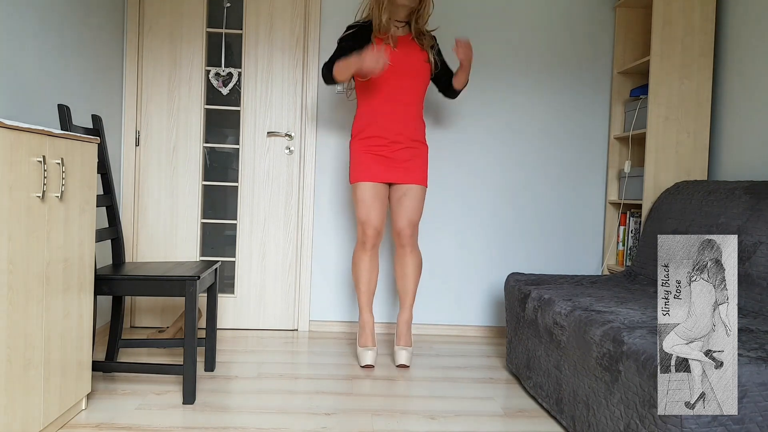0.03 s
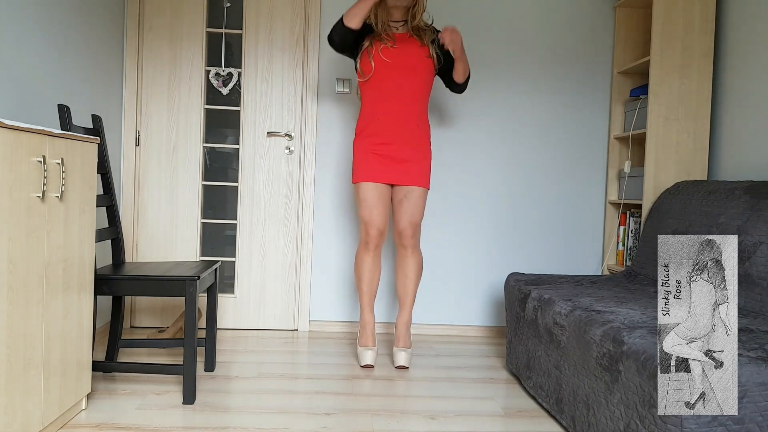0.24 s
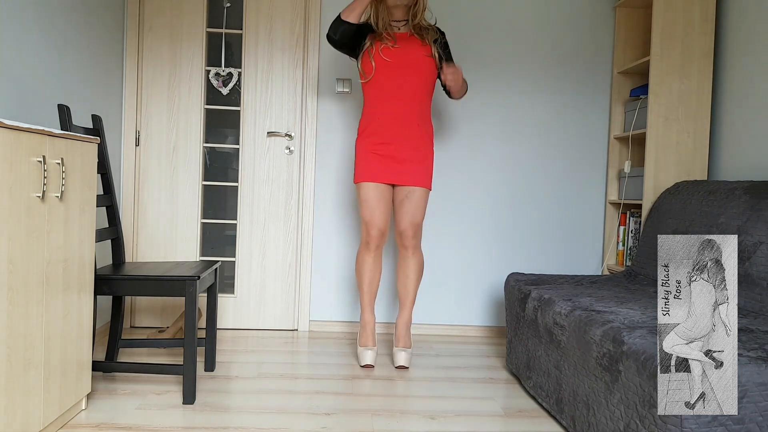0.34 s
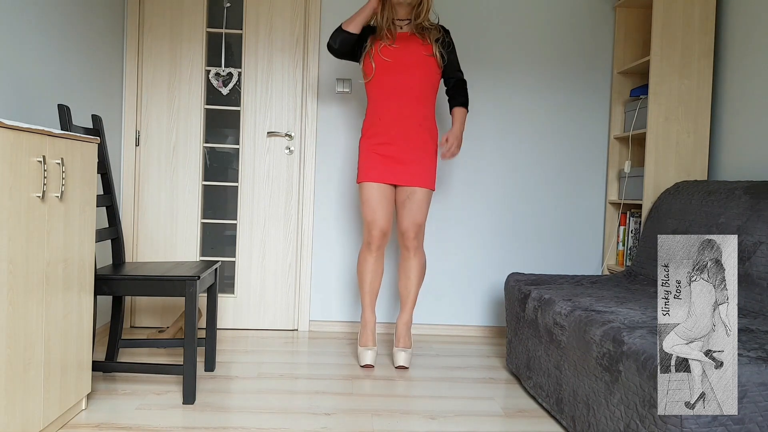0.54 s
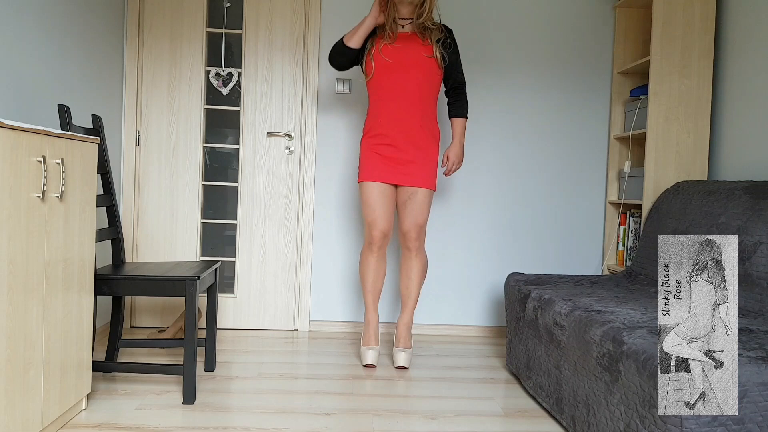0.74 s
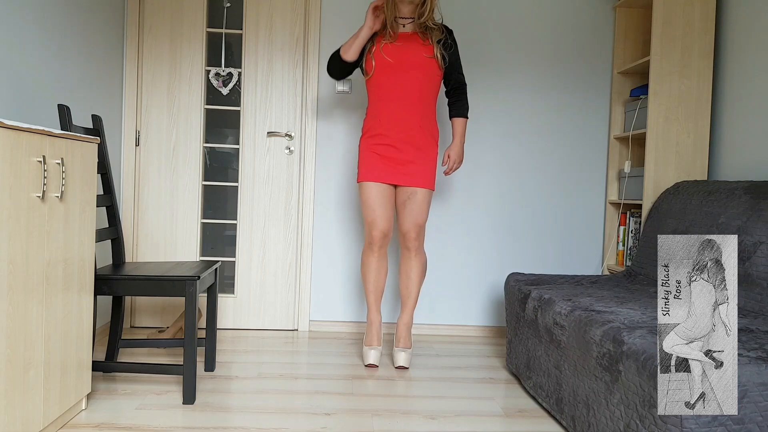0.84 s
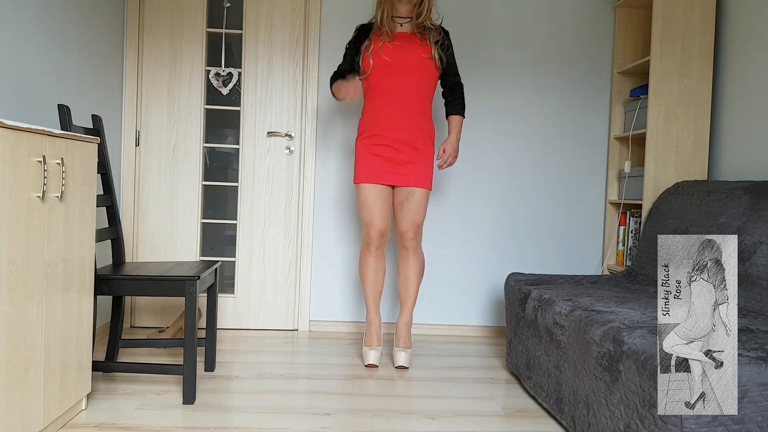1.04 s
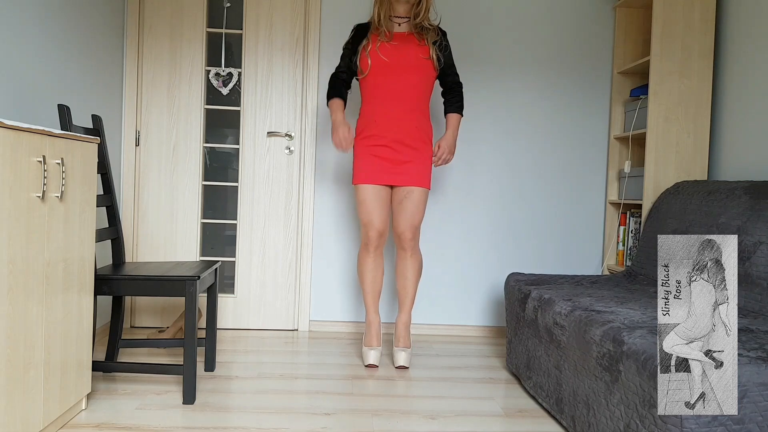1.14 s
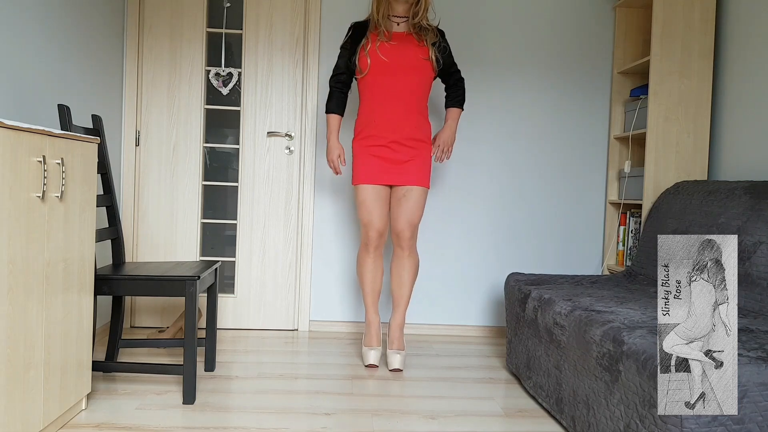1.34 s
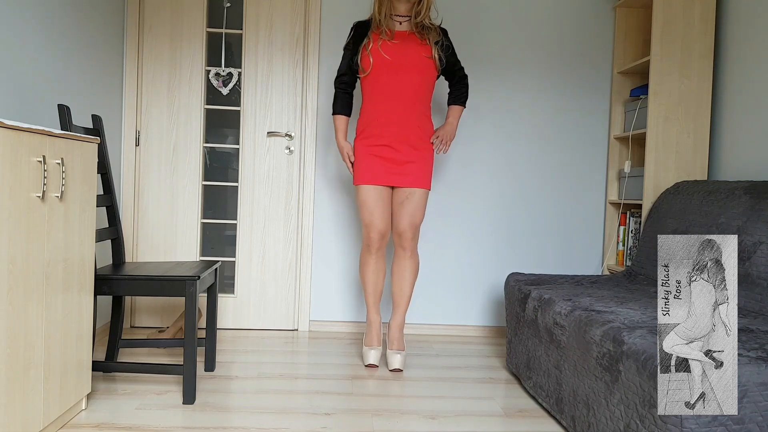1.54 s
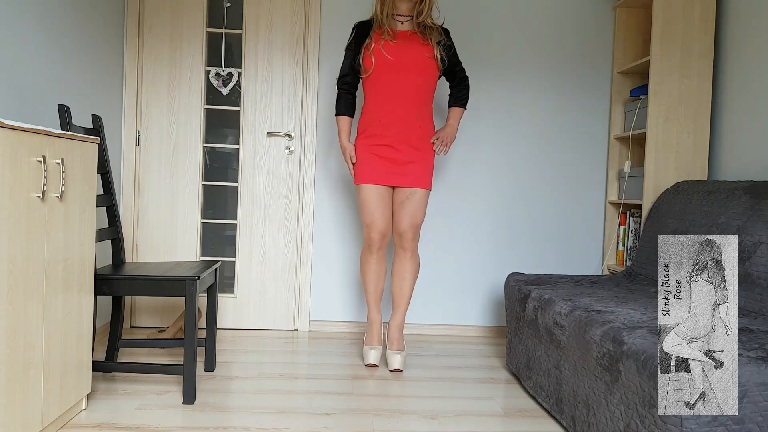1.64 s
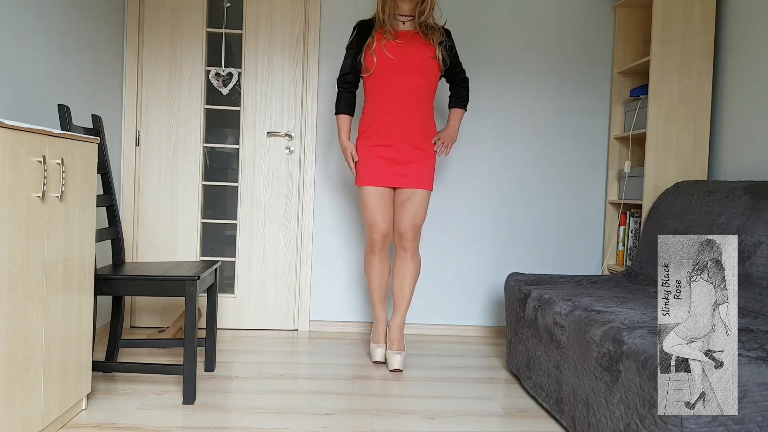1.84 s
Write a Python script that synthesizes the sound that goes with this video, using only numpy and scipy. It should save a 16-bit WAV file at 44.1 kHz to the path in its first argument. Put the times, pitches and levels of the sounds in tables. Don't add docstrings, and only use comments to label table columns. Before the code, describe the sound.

High-heeled shoes on a laminate floor. Faint sole and heel taps at the start, then a heavy woody step at 0.23 s with a low boom and a scuff fading by 0.6. Light heel-tip taps at 0.7, soft sole rolls around 0.85-1.0, dull creaking and taps near 1.2-1.3. A softer double step at 1.47-1.6, closing scuff and heel tap at 1.82. Small room, quiet rumble and hiss.

```python
import sys
import numpy as np
from scipy import signal
from scipy.fft import rfft, irfft, next_fast_len
from scipy.io import wavfile

SR = 44100
rng = np.random.default_rng(int(sys.argv[2]) if len(sys.argv) > 2 else 0)


def int16_out(signal):
    q = np.round(np.clip(np.atleast_2d(signal).T, -1, 1) * 32767)
    wavfile.write(sys.argv[1], SR, q.astype(np.int16))


def volts_from_decibels(level):
    exponent = np.asarray(level, float) / 20
    return 10 ** exponent


N = 81585

KNOCK_DB = -7


def unit(x):
    return x / np.sqrt(np.mean(x ** 2) + 1e-20)


def along(points, hz):
    f, v = np.transpose(points)
    return np.interp(np.log(hz + 1), np.log(f + 1), v)


def filtered(x, response):
    n = x.shape[-1]
    m = next_fast_len(n + 8192)
    return irfft(rfft(x, m) * response(np.fft.rfftfreq(m, 1 / SR)), m)[..., :n]


def spread(pair, spectrum, alike):
    def mid_and_side(hz):
        turn = np.arccos(np.clip(along(alike, hz), -1, 1)) / 2
        return volts_from_decibels(along(spectrum, hz)) * [np.cos(turn), np.sin(turn)]

    mid, side = filtered(pair, mid_and_side)
    return unit(np.array([mid + side, mid - side]))


# (frequency [Hz], level [dB per Hz])
TONE_COLOUR = [(25, -11), (75, -11.5), (200, -12.5), (400, -8.5), (900, -17.5), (2600, -22), (8000, -36),
               (13000, -33.5)]
# (frequency [Hz], likeness [-1 to 1])
NOISE_LIKENESS = [(40, 0.7), (150, 0.72), (600, 0.59), (2000, 0.031), (8000, .0)]


def room_tone():
    return volts_from_decibels(-63) * spread(rng.standard_normal((2, N)), TONE_COLOUR, NOISE_LIKENESS)


def rub(pressure, colour):
    grains_per_s, grain_spread_db, smooth_share = 2500, 1.5, 0.6
    happens = rng.random((2, N)) < grains_per_s / SR
    hits = happens * volts_from_decibels(grain_spread_db * rng.exponential(size=(2, N)))
    grit = unit(hits * rng.standard_normal((2, N)))
    drag = rng.standard_normal((2, N))
    noise = np.sqrt(1 - smooth_share) * grit + np.sqrt(smooth_share) * drag
    s, db = np.transpose(pressure)
    s = np.r_[s[0] - 0.015, s, s[-1] + 0.06]
    db = np.r_[db[0] - 20, db, db[-1] - 20]
    swell = volts_from_decibels(np.interp(np.arange(N) / SR, s, db, -120, -120))
    return spread(noise, colour, NOISE_LIKENESS) * swell


# (time [s], level [dB])
CREAK_PRESSURE = [(0.8, -78), (0.864, -83), (1.004, -63), (1.124, -97), (1.242, -74), (1.316, -57),
                  (1.358, -65), (1.382, -64), (1.42, -99)]
# (frequency [Hz], level [dB per Hz])
CREAK_TINT = [(88, -57), (150, -3), (476, -7), (538, -9), (1350, 0.5), (1510, -5.5), (4000, -35),
              (5200, -68), (8800, -120)]


def creak():
    return rub(CREAK_PRESSURE, CREAK_TINT) * volts_from_decibels(-2.5)


# (time [s], level [dB])
OPENING_PRESSURE = [(0.0, -78), (0.028, -58.5), (0.122, -68), (0.16, -106.5)]
# (time [s], level [dB])
MIDDLE_PRESSURE = [(0.226, -63), (0.24, -61), (0.326, -72.5), (0.494, -72), (0.616, -95), (0.62, -112)]
# (time [s], level [dB])
CLOSING_PRESSURE = [(1.64, -68), (1.67, -67.5), (1.704, -60.5), (1.768, -60), (1.812, -64.5), (1.85, -63.5)]
# (frequency [Hz], level [dB per Hz])
MIDDLE_COLOUR = [(120, -62), (200, -13), (410, -7.5), (598, -18.5), (1020, -7.5), (1440, -12.5),
                 (1720, -15.5), (11800, -34), (14600, -28)]
# (frequency [Hz], level [dB per Hz])
OUTER_COLOUR = [(150, -10.5), (350, -0.5), (650, -6), (1020, 1), (1500, -5.5), (2800, -13.5), (4800, -25),
                (12000, -38.5)]


def scuffs():
    opening = rub(OPENING_PRESSURE, OUTER_COLOUR)
    middle = rub(MIDDLE_PRESSURE, MIDDLE_COLOUR) * volts_from_decibels(16.5)
    closing = rub(CLOSING_PRESSURE, OUTER_COLOUR) * volts_from_decibels(7.5)
    return opening + middle + closing


def ringing(modes, t, pitch_hz, octaves, rise_s):
    hz, level_db, t60 = (column[:, None] for column in np.transpose(modes))
    scatter_db = 0.8 * rng.standard_normal(hz.shape)
    weight_db = level_db - 6 * (np.log2(hz / pitch_hz) / octaves) ** 2 + scatter_db
    tones = volts_from_decibels(weight_db - 60 * t / t60) * np.sin(2 * np.pi * hz * t)
    return -tones.sum(axis=0) * (1 - np.exp(-t / rise_s))


# (frequency [Hz], level [dB], time to fall 60 dB [s])
AIR_MODES = [(72, -11.5, 0.17), (114.4, 1.5, 0.075), (124.4, -11, 0.059), (164.5, -2.5, 0.28),
             (192.2, -9.5, 0.27), (251, -27, .3)]
# (time [s], level [dB])
LANDINGS = [
    (0.229, -32),
    (0.257, -25),
    (.95, -43),
    (1.297, -65),
    (1.469, -34),
    (1.495, -32),
    (1.564, -34.5),
    (1.621, -51),
    (1.819, -43),
]


def booms():
    out, t = np.zeros(N + SR), np.arange(round(0.6 * SR)) / SR
    for s, db in LANDINGS:
        boom = ringing(AIR_MODES, t, pitch_hz=190, octaves=1.7, rise_s=0.029)
        out[round(s * SR):][:len(t)] += volts_from_decibels(db + KNOCK_DB) * boom
    return out[:N]


# (left delay [s], right delay [s], level [dB])
WALL_ECHOES = [(.004, 0.0063, -7.5), (.0083, 0.013, -11), (0.0154, 0.0088, -10.5), (.019, 0.026, -13.5),
               (.031, 0.011, -18.5)]
# (frequency [Hz], time to fall 60 dB [s])
TAIL_DECAY = [(120, 0.93), (500, 0.31), (2000, 0.49), (6000, 0.1), (13000, 0.051)]
# (frequency [Hz], likeness [-1 to 1])
TAIL_LIKENESS = [(150, 0.86), (400, 1), (1000, 0.16), (2500, -0.24), (12000, -0.3)]


def room(x, tail_db):
    n = len(x)
    hz, t, z = signal.stft(rng.standard_normal((2, n)), SR, nperseg=256)
    fading = z * volts_from_decibels(-60 * t / along(TAIL_DECAY, hz)[:, None])
    pair = signal.istft(fading, SR, nperseg=256)[1][:, :n]
    build_up = 1 - np.exp(-(np.arange(n) / SR / 0.0066) ** 2)
    tail = spread(pair, [(1000, 0)], TAIL_LIKENESS) * build_up
    answer = volts_from_decibels(tail_db) * tail / np.linalg.norm(tail[0])
    answer[:, 0] = 1
    for left_s, right_s, db in WALL_ECHOES:
        answer[[0, 1], [round(left_s * SR), round(right_s * SR)]] += volts_from_decibels(db)
    return signal.fftconvolve(x[None], answer, axes=1)[:, :n]


# (frequency [Hz], level [dB per Hz])
CLICK_COLOUR = [(900, -37), (1500, -18), (2300, -2), (3200, 0), (5000, -0.5), (7500, -20.5), (11500, -14),
                (14600, -19)]


def tip_click(t, dull):
    def response(hz):
        loss_db = dull * np.log2(1 + (hz / 6500) ** 2) / 2
        return volts_from_decibels(along(CLICK_COLOUR, hz) - loss_db)

    return unit(filtered(rng.standard_normal(len(t)), response)) * volts_from_decibels(-60 * t / 0.1)


def contacts(rows, modes, gain_db, tail_db, softer=1):
    hard_db, dulling = -57, 0.6
    out, t = np.zeros((2, N + SR)), np.arange(round(0.6 * SR)) / SR
    low_cut = signal.butter(2, 118, "high", fs=SR)
    for s, db, pitch_hz, octaves, click_db in rows:
        rise_s = softer * 0.66 / (pitch_hz * np.clip(octaves, 0.35, 1))
        ring = signal.lfilter(*low_cut, ringing(modes, t, pitch_hz, octaves, rise_s))
        click = tip_click(t, dulling * max(hard_db - db - click_db, 0))
        knock = room(volts_from_decibels(gain_db) * ring, tail_db)
        knock = knock + room(volts_from_decibels(click_db + 0.5) * click, tail_db=-4)
        out[:, round(s * SR):][:, :len(t)] += volts_from_decibels(db) * knock
    return out[:, :N]


# (frequency [Hz], level [dB], time to fall 60 dB [s])
HEEL_MODES = [(336, 4, 0.033), (540, 1, 0.038), (834, -1, 0.027), (1040, 3, 0.023), (1192, 2, 0.015),
              (1386, 0.5, 0.0083), (1860, 0, 0.024), (2230, -3.5, 0.019), (2920, -5, 0.005)]
# (time [s], level [dB], contact pitch [Hz], width [octaves], click over the knock [dB])
HEEL_TAPS = [(.0218, -38, 663, 1.26, -35.5), (.0255, -36.5, 330, 0.84, -46), (.680, -31, 964, 0.79, -34.5),
             (.6845, -33.5, 1040, 0.68, -44), (.716, -41, 1150, 0.45, -35), (.690, -38.5, 1700, 1.3, -37),
             (.703, -43, 1190, 0.78, -27.5), (.731, -41.5, 1270, 0.7, -49), (.752, -51, 1117, 1.7, -46),
             (1.275, -43.5, 1090, 0.93, -33), (1.279, -41, 394, 1.1, -42),
             (1.3042, -37.5, 970, 1.14, -33.5), (1.3075, -38, 353, 0.51, -44),
             (1.821, -34, 970, 0.89, -31.5)]


def heel_taps():
    return contacts(HEEL_TAPS, HEEL_MODES, gain_db=-11, tail_db=-10)


# (frequency [Hz], level [dB], time to fall 60 dB [s])
BOARD_MODES = [(322.5, -6.5, 0.039), (356.6, 0, 0.052), (434.6, -3, 0.039), (505.3, 6.5, 0.02),
               (548, 4.5, 0.023), (659.6, 0.5, 0.05), (763.6, -5.5, 0.067), (809.6, -1, 0.044),
               (842.3, -2.5, 0.025), (1026, 3, 0.039), (1110, 2, 0.024), (1283, -0.5, 0.036),
               (1680, -1, 0.044), (1860, -16, 0.016)]
# (time [s], level [dB], contact pitch [Hz], width [octaves], click over the knock [dB])
SOLE_ROLLS = [(0.001, -48, 356, 0.64, -47), (.066, -43, 575, .3, -29), (0.818, -67, 450, 0.69, -32),
              (.856, -45, 670, 0.48, -37), (.866, -40, 656, 0.4, -41), (.884, -47.5, 670, 0.56, -37),
              (0.8975, -37.5, 575, 0.45, -43), (.908, -45, 590, 0.49, -42), (.921, -49, 600, 0.48, -40),
              (.835, -49, 503, 0.36, -43), (.947, -39.5, 557, 0.56, -45), (.952, -36, 600, 0.47, -47),
              (0.992, -39, 510, 0.31, -35), (1.015, -54, 486, 1, -33), (1.206, -53, 403.6, 0.63, -51),
              (1.223, -33.5, 343, 0.2, -51), (1.238, -49, 400, 0.55, -45), (1.255, -43.5, 375, 1, -49)]


def sole_rolls():
    return contacts(SOLE_ROLLS, BOARD_MODES, KNOCK_DB, tail_db=-10.5, softer=1.6)


# (time [s], level [dB], contact pitch [Hz], width [octaves], click over the knock [dB])
BRUSH_DOWN = [
    (.213, -47, 700, 1.1, -30),
    (.2175, -44, 600, 1.1, -34),
    (.222, -39, 600, 1.1, -36),
]
# (time [s], level [dB], contact pitch [Hz], width [octaves], click over the knock [dB])
FOOTSTEPS = [(.2262, -15.5, 416, 1.05, -32.5), (.2288, -15, 320, 0.25, -42), (.2345, -21, 700, .5, -38),
             (.2398, -12.5, 545, 0.3, -39), (.2495, -22, 800, 0.35, -38), (.2575, -20, 560, 0.7, -38),
             (.2655, -27, 450, .5, -35), (.276, -31, 780, .6, -33), (.2912, -22, 440, .7, -38),
             (.309, -35, 530, .3, -38), (.322, -33, 400, .8, -38), (.338, -30, 430, .25, -42),
             (.358, -37, 450, .6, -40), (1.4705, -30, 580, 1.0, -32), (1.4745, -30, 530, 0.4, -37),
             (1.478, -28, 505, 0.3, -43), (1.4842, -26, 580, 0.55, -37), (1.497, -39, 450, .9, -35),
             (1.510, -43, 900, .6, -40), (1.559, -33, 321, 0.4, -43), (1.562, -28, 320, .35, -43),
             (1.568, -36, 900, .6, -38), (1.5728, -29, 610, 0.4, -42), (1.585, -32, 870, 0.3, -40),
             (1.596, -36, 980, 0.3, -40), (1.602, -38, 500, .35, -45), (1.622, -43, 380, .6, -45)]


def steps():
    return contacts(FOOTSTEPS + BRUSH_DOWN, BOARD_MODES, KNOCK_DB, tail_db=-10.5)


def scene():
    background = room_tone() + creak() + scuffs()
    return background + booms() + heel_taps() + sole_rolls() + steps()


# (frequency [Hz], left over right [dB])
MICROPHONE_LEAN = [(60, 1), (500, -0.9), (2000, 1.2), (5500, 2.5), (9000, -5), (13000, 2)]


def microphones(dry):
    def response(hz):
        lean_db = along(MICROPHONE_LEAN, hz) * np.array([[0.5], [-0.5]])
        return volts_from_decibels(lean_db) * (hz < 14560)

    return filtered(dry, response) - 0.0005


def roll_off(x):
    return signal.sosfilt(signal.butter(12, 14750, fs=SR, output="sos"), x)


def record(dry):
    mix = microphones(dry)
    return roll_off(mix)


dry = scene()
out = record(dry)
int16_out(out)
```